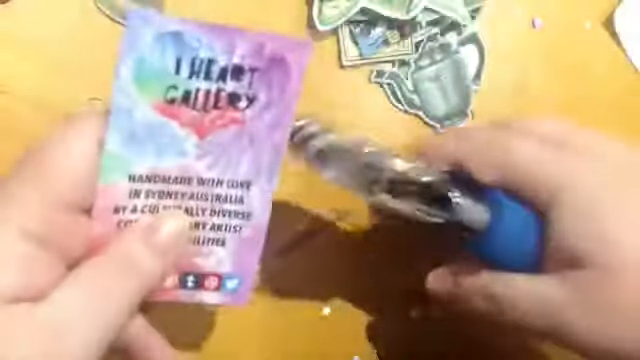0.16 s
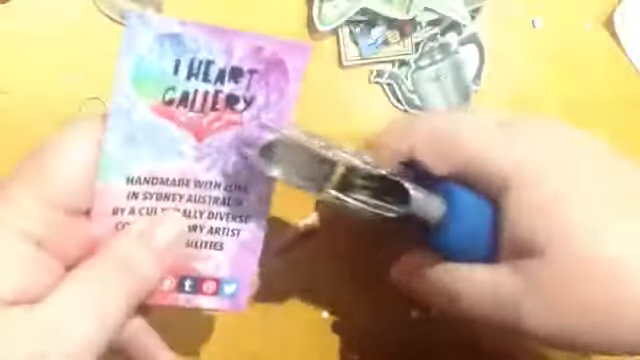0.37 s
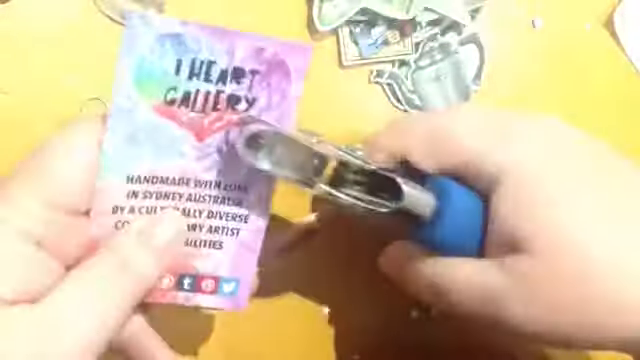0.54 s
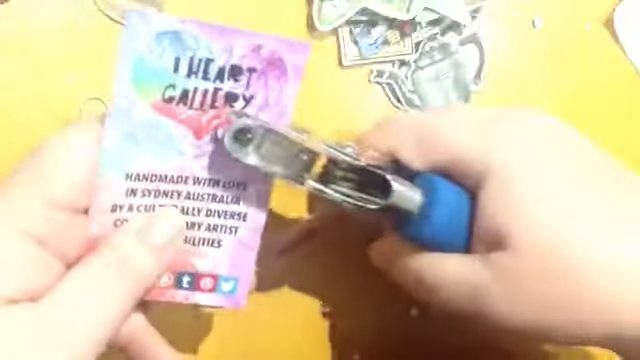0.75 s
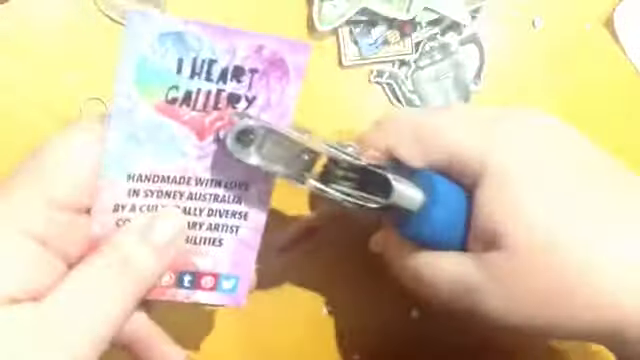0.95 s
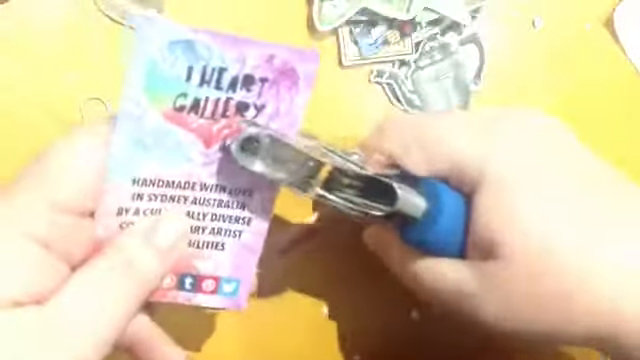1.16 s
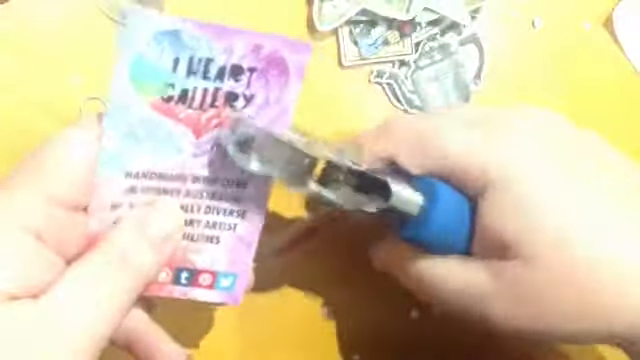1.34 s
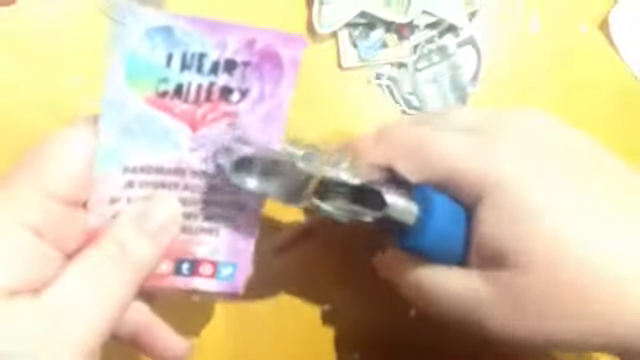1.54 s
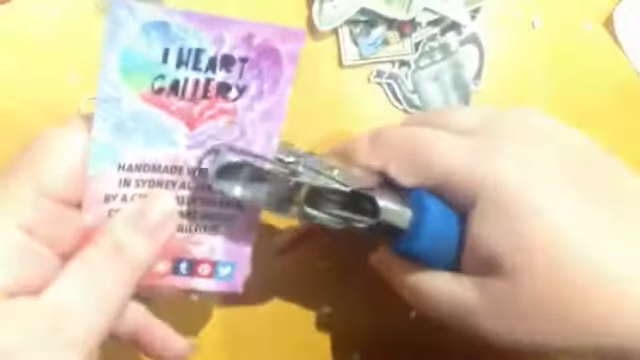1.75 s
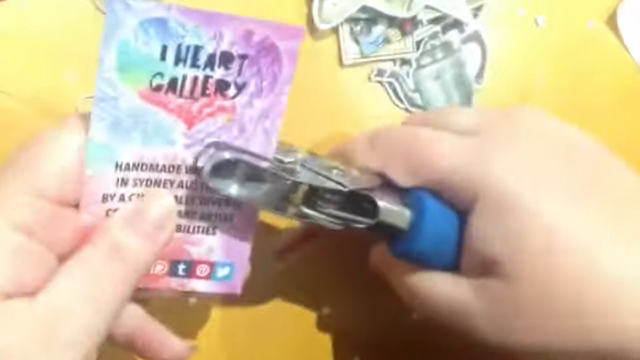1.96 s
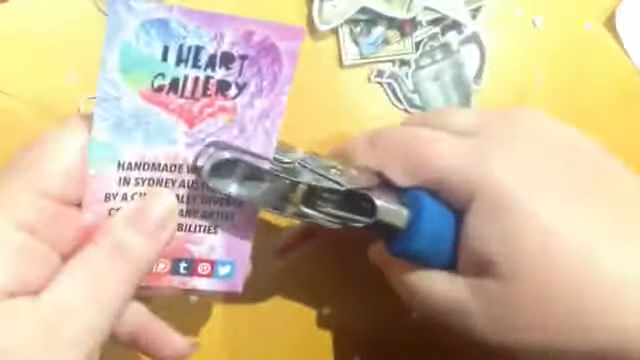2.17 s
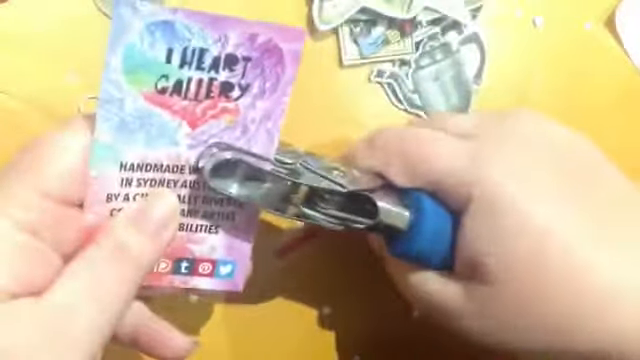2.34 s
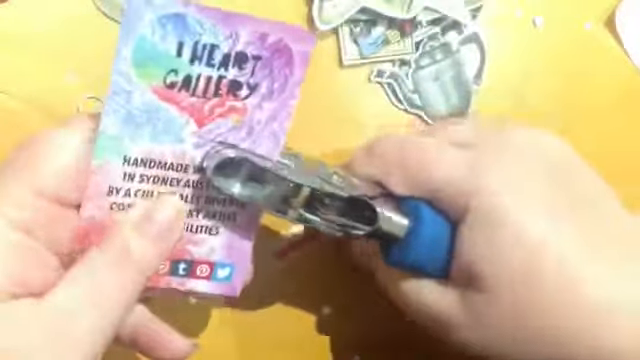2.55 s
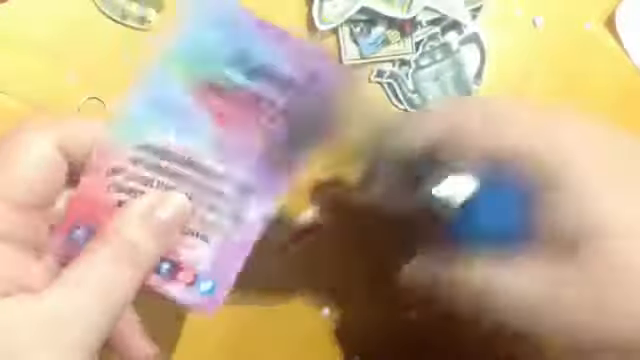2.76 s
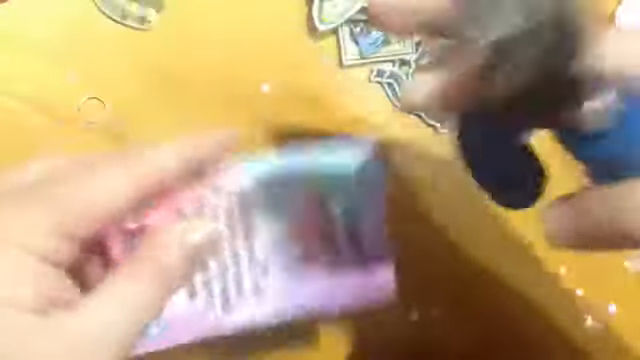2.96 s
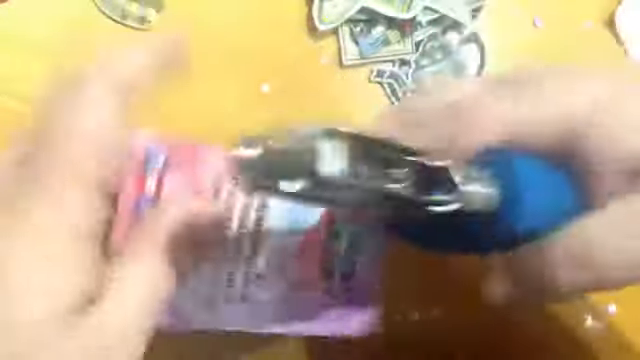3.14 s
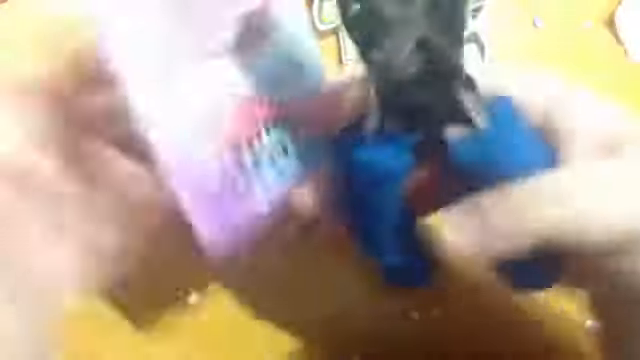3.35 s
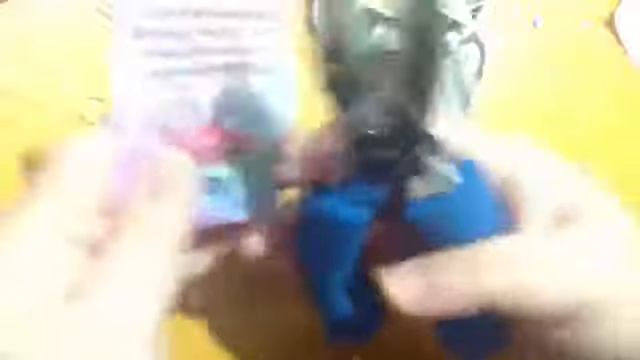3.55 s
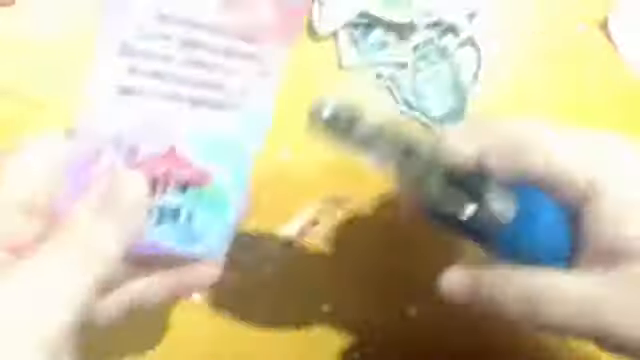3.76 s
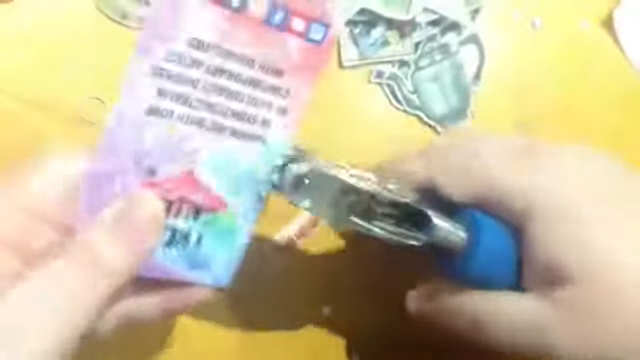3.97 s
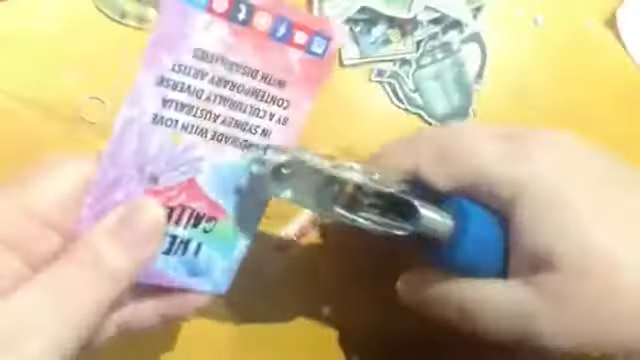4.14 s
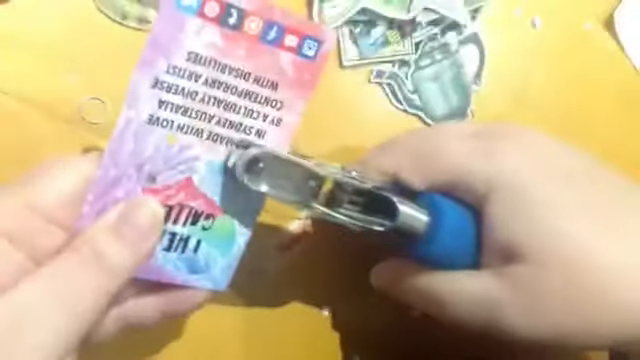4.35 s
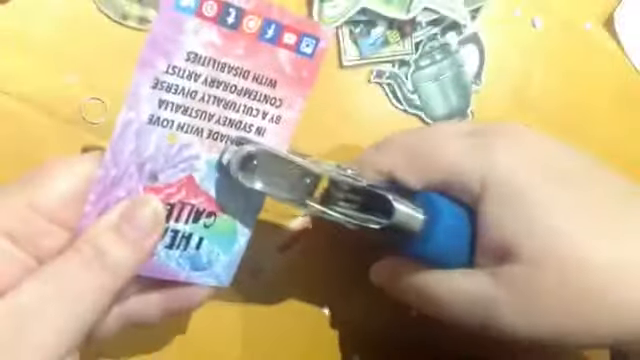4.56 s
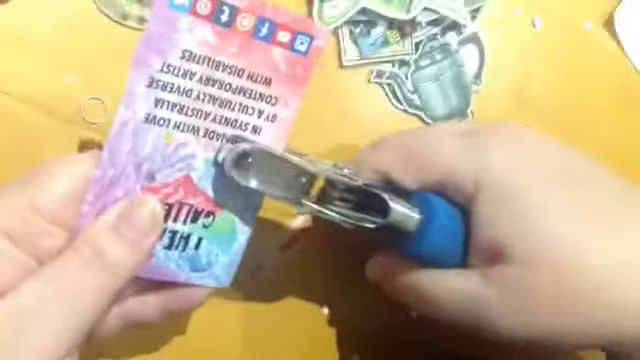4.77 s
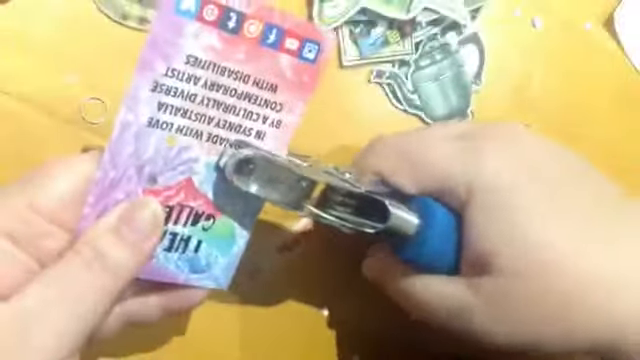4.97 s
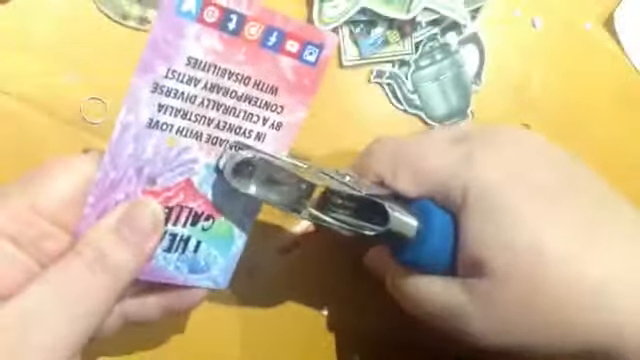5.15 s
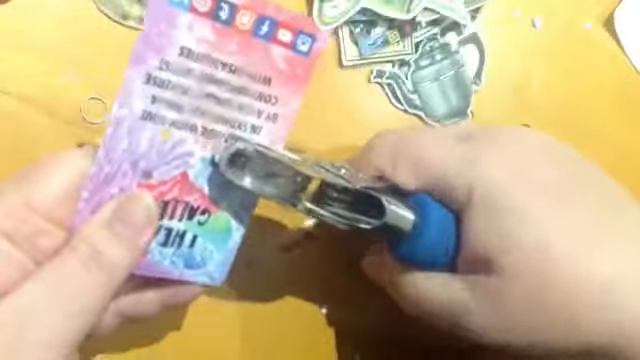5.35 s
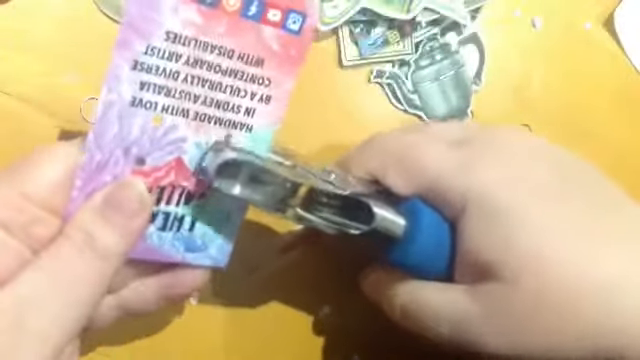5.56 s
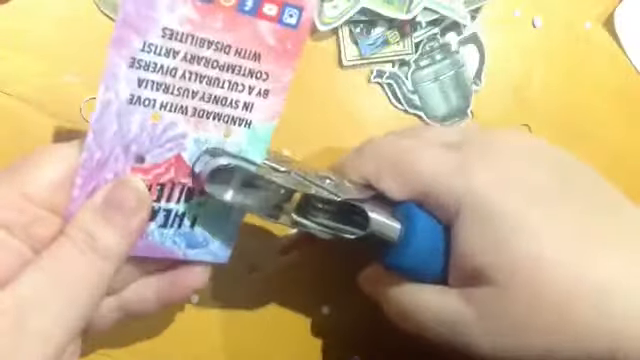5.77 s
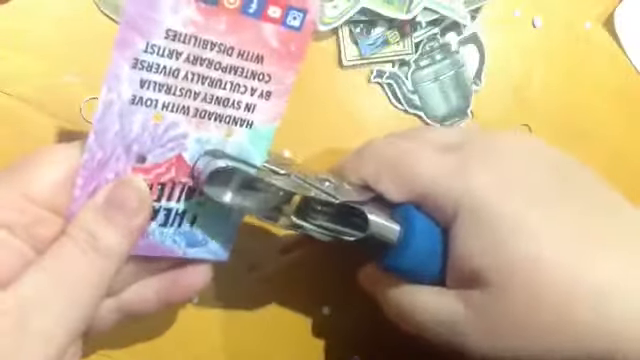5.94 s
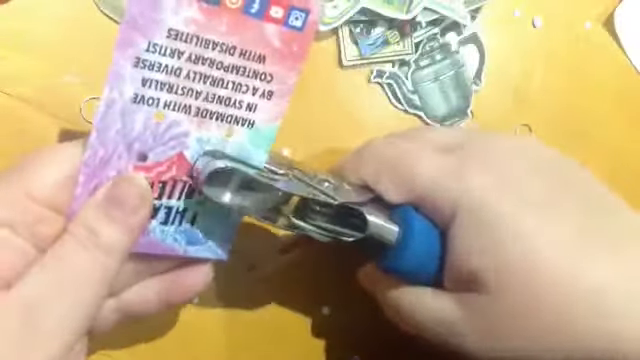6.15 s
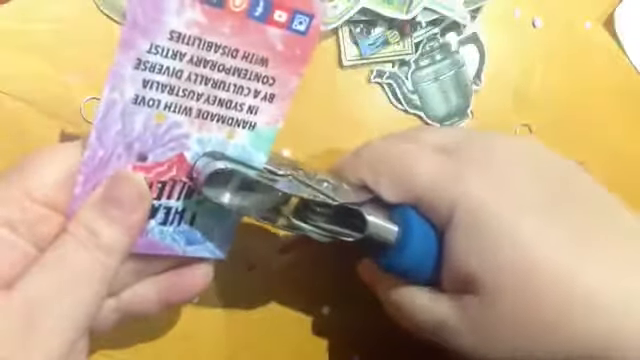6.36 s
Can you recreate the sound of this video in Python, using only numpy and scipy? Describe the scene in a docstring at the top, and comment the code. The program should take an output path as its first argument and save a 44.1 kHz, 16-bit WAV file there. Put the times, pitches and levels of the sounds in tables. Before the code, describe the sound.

A close microphone in a small, lightly reverberant room, with soft air noise and a low drone underneath. From 0 to 0.3 seconds card rustles and fingers tick faintly, then the grip creaks softly. At 1.1 a steel punch snaps through card: an abrupt, very loud crack with a short bright ring and quick room tail. A small clack follows at 1.3. After a light tick at 2.1, the second snap lands at 2.4 with a heavier low thump, and a very faint release at 2.6. From 2.6 to 3.9 card slides, hisses and crackles against fingers, with ticks and tiny jaw rattles near 3.55 and 3.85. A tick at 4.0, then faint gripping and a tiny spring ping around 4.5. The third snap at 5.1 is crisp, with more fibre tear; a clack at 5.3, then sparse ticks at 5.8 and 6.2. Background dips after each snap and creeps back.

```python
"""A steel hand punch

The punch bites through a card three times, close up in a small room.
Each bite tears fibres, snaps the jaws shut and rings the steel; then the pin clacks back out of the hole.
In between, card and fingers rub and tick, jaws rattle and a spring pings. A low drone fills the room.
Blows are brief noisy forces sent through resonances; rubbing is shaped noise.
An automatic gain control ducks at each snap and creeps back."""
import sys
import numpy as np
from scipy import signal
from scipy.fft import rfft, irfft, next_fast_len
from scipy.io import wavfile
from scipy.ndimage import uniform_filter1d, minimum_filter1d, map_coordinates

SR = 44100
rng = np.random.default_rng(int(sys.argv[2]) if len(sys.argv) > 2 else 0)


def generate_wav(sig):
    """Save sig (samples, or channels by samples) to the path in sys.argv[1] as 16-bit PCM at SR."""
    pcm = np.round(np.clip(np.atleast_2d(sig).T, -1, 1) * 32767).astype(np.int16)
    wavfile.write(sys.argv[1], SR, pcm)


N = 282636
TIME = np.arange(N) / SR  # seconds
HIT_TIME = TIME[:SR // 2]  # the half second that one blow may last
TOP_HZ = 15550  # upper edge of the finished sound

# The card gives way. Each row: start in seconds, level in dB, bass lift from the jolted hand in dB,
# contact time in seconds, tearing time before it in seconds, tearing level beside the snap in dB.
SNAPS = [(1.1094, 6, 5.5, 0.0015, 0.0014, -19), (2.4060, 5, 10.5, 0.0015, .0036, -23.5),
         (5.1342, 6, 1.5, 0.0011, 0.002, -11)]
# Colour of the shut jaws. Each row: frequency in Hz, relative level in dB per Hz.
JAW_COLOUR = [(40, -28.5), (150, -8.5), (300, -9.5), (450, -7), (600, -3), (850, 0), (1150, -0.5),
              (1500, -7.5), (1950, -8.5), (2600, -17), (3150, 3), (4000, -7), (4600, 0.5), (5600, -12.5),
              (8500, -10), (15000, -16.5)]
# How the jolt spreads over the bass. Each row: frequency in Hz, share of the bass lift (no unit).
THUMP_SHARE = [(40, 0.33), (130, 1), (280, 1), (450, 0.69), (650, 0.025)]
# Ringing of the steel frame and handles.
# Each row: frequency in Hz, strength beside the slam in dB, time to fade by 60 dB in seconds.
STEEL_MODES = [(570, -6, 0.05), (720, -9.5, 0.031), (798.3, -2.5, 0.08), (833, -4.5, 0.1),
               (1023, 2.5, 0.12), (1110, -3, 0.13), (1104, -3, 0.08), (1840, -6, 0.082), (3235, -2.5, .08),
               (3238, -6.5, .16), (3700, 1.5, 0.038), (4370, -2.5, 0.048), (4720, -5.5, 0.13),
               (6080, -4.5, 0.02), (8330, -1.5, 0.05), (10480, -3.5, 0.02), (13000, -0.5, 0.04)]
# Colour of card being torn or touched. Each row: frequency in Hz, relative level in dB per Hz.
CARD_COLOUR = [(300, -21.5), (2500, -10), (3900, 2.5), (5000, -2.5), (6200, -2), (9000, -2.5), (15000, -11)]

# The pin springs free of the card.
# Each row: start in seconds, level in dB, scrape beside the clack in dB, contact time in seconds.
RELEASES = [(1.2833, -19.5, -6.5, .0008), (2.6013, -33.5, 5, .001), (5.3256, -24, -2, 0.001586)]
# Colour of a clack or knock. Each row: frequency in Hz, relative level in dB per Hz.
CLACK_COLOUR = [(60, -31), (200, -16.5), (450, -8.5), (900, -14), (1350, -1.5), (1850, -3.5), (2500, -25),
                (3900, -11.5), (5500, -30.5), (15000, -44.5)]
# Ringing of the lever.
# Each row: frequency in Hz, strength beside the clack in dB, time to fade by 60 dB in seconds.
LEVER_MODES = [(1405, -5, 0.026), (1830, -6.5, 0.02), (3940, -5, 0.022)]

# Light touches of card and jaws. Each row: start in seconds, level in dB,
# hollow knock in dB before a lift shared by all, ring of the part touched in Hz.
TICKS = [(0.0632, -37.5, -27, 4530), (0.0913, -40.5, -21, 5060), (0.1129, -39, -37, 5500),
         (0.2228, -41, -43, 5800), (0.2993, -48.5, -5, 3870), (0.6471, -49.5, -7.5, 3790),
         (2.1301, -38.5, -25.5, 3830), (2.2603, -51.5, 3, 3284), (2.7277, -41, -6, 5600),
         (3.057, -48.5, -7.5, 5650), (3.1156, -39.5, -14, 4630), (3.2303, -45, -9, 7000),
         (3.364, -48.5, -5.5, 3950), (4.0302, -37, -23.5, 4820), (4.4667, -44, -19, 3975),
         (4.4922, -43.5, -21.5, 4610), (5.0518, -47, -17, 3720), (5.7623, -50, -16, 3483),
         (6.1584, -35, -27, 3826)]
# The open jaws rattle on their rivet. Each row: start in seconds, level of the first contact in dB.
RATTLES = [(3.552, -40.5), (3.831, -45.5)]
# Ringing of the loose jaws.
# Each row: frequency in Hz, strength beside the rattle in dB, time to fade by 60 dB in seconds.
RIVET_MODES = [(1230, 7.5, 0.01), (5200, 9.5, 0.0078), (6050, 6, 0.011)]
# The spring shifts in its seat. Each row: start in seconds, level in dB before it fades.
PINGS = [(.570, -64.5), (4.491, -53.5)]

# The card slides over fingers and jaws.
# Each row: start in seconds, length in seconds, hiss in dB, scrape in dB.
STROKES = [(0.09, .06, -56, -92), (0.292, 0.21, -70.5, -69), (2.649, 0.068, -57, -51.5),
           (2.724, 0.044, -44.5, -51.5), (2.802, 0.072, -56.5, -66.5), (2.859, 0.054, -53.5, -57),
           (3.052, 0.053, -59.5, -66.5), (3.105, 0.097, -55.5, -55), (3.362, 0.11, -57, -63),
           (3.472, 0.22, -58, -73), (3.684, .055, -62, -77), (4.03, 0.2, -65, -71.5),
           (4.874, .11, -77.5, -64)]
# The hands bring the card up and later turn it round.
# Each row: start in seconds, length in seconds, rustle in dB.
HANDLING = [(0, 0.35, -71.5), (2.601, 0.98, -71.5)]
# Colour of the sliding hiss. Each row: frequency in Hz, relative level in dB per Hz.
HISS_COLOUR = [(500, -6), (2500, -8), (4000, -5), (7000, -9), (11000, -7.5), (15000, -11.5)]
# Colour of small slips of card or skin. Each row: frequency in Hz, relative level in dB per Hz.
SLIP_COLOUR = [(200, 0.5), (900, 14.5), (5000, 4), (15000, -8.5)]
# Resonances that the card's slips excite. Each row: frequency in Hz, relative level in dB.
SCRAPE_MODES = [(1100, -2), (1450, 1), (1900, -2.5), (3900, -3.5)]
# The hand takes hold of the handles or squeezes them.
# Each row: start in seconds, length in seconds, level in dB.
GRIPS = [(0, 0.42, -70), (0.699, 0.61, -76), (4.45, .68, -70)]

# How long the room rings. Each row: frequency in Hz, time to fade by 60 dB in seconds.
ROOM_FADE = [(150, .2), (400, 0.48), (1000, 0.44), (1500, .28), (3500, .38), (8000, 0.29), (15000, 0.19)]
# Tone of the room's reverberation. Each row: frequency in Hz, level in dB.
ROOM_TONE = [(100, -15.5), (220, -10), (400, -3), (1000, 3.5), (1700, -3), (2500, 7), (3200, -1),
             (4500, -4), (6000, 2), (8000, 1.5), (15000, 3)]
# Echoes from desk and walls. Each row: delay in seconds, level in dB before they are dulled.
ECHOES = [(.0034, -15), (.0088, -24.5), (0.0123, -22), (0.058, -28.5), (0.068, -39)]
# Colour of the room background. Each row: frequency in Hz, relative level in dB per Hz.
AIR_COLOUR = [(15, -69.5), (25, -38.5), (49, -33), (101, -18), (135, -7), (163, 0.5), (257, -11.5),
              (344, -12), (438, -18.5), (604, -18.5), (856, -20.5), (1030, -20.5), (1580, -24.5),
              (4750, -27), (15000, -31)]


def snaps():
    """Fibres tear, the jaws slam shut, the hand takes the jolt and the slam sets the steel ringing."""
    out = np.zeros(N)
    for s, db, thump_db, width, tearing, tear_db in SNAPS:
        colour = [(hz, level + thump_db * along(THUMP_SHARE, hz)) for hz, level in JAW_COLOUR]
        slam = strike(contact(width), colour)
        tear = strike(contact(tearing * 0.54), CARD_COLOUR)
        add(out, s, amp(db) * ringing(slam, STEEL_MODES))
        add(out, s - tearing, amp(db + tear_db) * tear)
    return out


def releases(scrape_width=0.00092, scrape_lead=0.000562):
    """The pin scrapes out of its hole and the lever clacks open (settings in seconds)."""
    out = np.zeros(N)
    for s, db, scrape_db, width in RELEASES:
        clack = strike(contact(width), CLACK_COLOUR)
        scrape = strike(contact(scrape_width), CARD_COLOUR)
        add(out, s, amp(db) * clack)
        add(out, s - scrape_lead, amp(db + scrape_db) * scrape)
    return ringing(out, LEVER_MODES)


def touches(knock_db=7, edge_db=-8, ring_db=11, ring_t60=0.022, width=0.0013):
    """Light contacts: a dry tick of the card edge, a hollow knock and a brief ring of the part touched."""
    out = np.zeros(N)
    for s, db, hollow_db, hz in TICKS:
        tick = strike(contact(width), CARD_COLOUR)
        edge = amp(edge_db) * ringing(tick, [(hz, ring_db, ring_t60)])
        knock = amp(hollow_db + knock_db) * strike(contact(width), CLACK_COLOUR)
        add(out, s, amp(db) * (edge + knock))
    return out


def rattles(flight=.004, loss_db=5, knock_db=-7, width=.0035, count=3):
    """The loose jaws bounce a few times, a flight (seconds) apart, each contact set weaker than the last."""
    out = np.zeros(N)
    for s, db in RATTLES:
        for k in range(count):
            knock = amp(knock_db) * strike(contact(width), CLACK_COLOUR)
            blow = strike(contact(width), CARD_COLOUR) + knock
            add(out, s + k * flight, amp(db - k * loss_db) * blow)
    return ringing(out, RIVET_MODES)


def spring(hz=2800, q=10, t60=0.14, rise=0.00072):
    """The coils scrape on each other and ring faintly: resonant noise that rises fast and fades."""
    out = np.zeros(N)
    for s, db in PINGS:
        scrape = rng.standard_normal(len(HIT_TIME))
        coil = unit(resonate(resonate(scrape, hz, q), hz, q))
        fade = amp(db - 60 * HIT_TIME / t60)
        add(out, s, fade * coil * (1 - np.exp(-HIT_TIME / rise)))
    return out


def rubbing(grain_db=2.0, slip_db=4, catch_db=2.5, scrape_q=7, rustle_scrape_db=-2, crackle_db=-4):
    """Sliding card hisses and crackles, its tiny slips excite resonances; handling adds a soft rustle."""
    grainy = unit(amp(grain_db * wobble(1200)) * noise(HISS_COLOUR))
    hiss = unit(grainy + amp(crackle_db) * crackle())
    slips = unit(amp(slip_db * wobble(830)) * noise(SLIP_COLOUR))
    scrape = unit(sum(amp(db) * unit(resonate(slips, hz, scrape_q)) for hz, db in SCRAPE_MODES))
    strokes = np.zeros(N)
    for s, length, hiss_db, scrape_db in STROKES:
        strokes += pressure(s, length) * (amp(hiss_db) * hiss + amp(scrape_db) * scrape)
    moving = sum(amp(db) * pressure(s, length) for s, length, db in HANDLING)
    rustle = moving * (hiss + amp(rustle_scrape_db) * scrape)
    return (strokes + rustle) * amp(catch_db * wobble(90))  # the level flutters


def crackle(rate=260, size_db=5):
    """Tiny catches of the card's fibres at random moments, rate a second on average; rms 1."""
    size = amp(size_db * np.minimum(rng.exponential(size=N), 2))
    catches = (rng.random(N) < rate / SR) * size * rng.choice([-1, 1], N)
    return unit(signal.fftconvolve(catches, strike(contact(width=.0003), CARD_COLOUR))[:N])


def grip(slip_db=4, hz=720, q=3.9):
    """Skin creeps on the handles while the grip tightens: uneven noise through one resonance."""
    creep = unit(resonate(amp(slip_db * wobble(600)) * noise(SLIP_COLOUR), hz, q))
    return creep * sum(amp(db) * pressure(s, length, skew=0.69, softness=0.44) for s, length, db in GRIPS)


def pressure(s, length, skew=0.49, softness=0.74):
    """A stroke's strength swells fast and fades."""
    u = np.clip((TIME - s) / length, 0, 1)
    return np.abs(np.sin(np.pi * u ** skew)) ** softness


def contact(width, scatter=0.58, patch_hz=220):
    """A brief rough force of energy 1: every frequency arrives, each at a slightly different moment."""
    hz = np.fft.rfftfreq(2048, 1 / SR)
    knots = rng.standard_normal(len(hz))
    # Neighbouring frequencies share similar delays, around the contact time in seconds.
    delay = width * np.exp(scatter * np.clip(map_coordinates(knots, [hz / patch_hz]), -2, 2))
    phase = -2 * np.pi * hz[1] * np.cumsum(delay)
    force = irfft(np.exp(1j * phase))[:len(hz)]
    force *= np.exp(-(HIT_TIME[:len(hz)] / (5 * width)) ** 4)  # fades out the late end
    return force / np.linalg.norm(force)


def strike(force, spectrum):
    """A force through a damped body that responds only after it; about as strong as 1 ms at full level."""
    size = len(HIT_TIME)
    # Folding the log spectrum's transform puts the body's energy as early as possible.
    cepstrum = irfft(np.log(amp(along(spectrum, np.fft.rfftfreq(size, 1 / SR)))))
    fold = 1 + np.sign(np.fft.fftfreq(size))
    body = irfft(np.exp(rfft(cepstrum * fold)))
    gain = np.sqrt(SR / 1000) / np.linalg.norm(body)
    return gain * signal.fftconvolve(force, body)[:size]


def ringing(blow, modes):
    """A blow plus the decaying resonances that it excites."""
    out = blow.copy()
    for hz, db, t60 in modes:
        q = np.pi * hz * t60 / np.log(1000)  # sharpness that gives this fading time
        out += amp(db) * resonate(blow, hz, q)
    return out


def resonate(x, hz, q):
    """One resonance with gain 1 at its peak."""
    return signal.lfilter(*signal.iirpeak(hz, q, SR), x)


def noise(spectrum):
    """Coloured noise of rms 1."""
    m = next_fast_len(N)
    white = rfft(rng.standard_normal(m))
    return unit(irfft(white * amp(along(spectrum, np.fft.rfftfreq(m, 1 / SR))), m)[:N])


def wobble(rate):
    """A smooth random curve through rate random points a second."""
    return map_coordinates(rng.standard_normal(int(N * rate / SR) + 4), [TIME * rate])


def amp(db):
    """Decibels to gain."""
    return 10 ** (np.asarray(db) / 20)


def unit(x):
    """Scale to rms 1."""
    return x / np.sqrt(np.mean(x ** 2) + 1e-20)


def along(points, hz):
    """Read off a curve of (Hz, value) points joined on a log frequency axis."""
    f, v = np.transpose(points)
    return np.interp(np.log(hz + 1), np.log(f), v)


def add(track, s, sound):
    """Mix a sound into a track at time s in seconds."""
    part = track[max(round(s * SR), 0):][:len(sound)]
    part += sound[:len(part)]


def room(x, early_db=-16, early_t60=0.099, late_db=-13.0, build=.0012, echo_low_hz=600, echo_hz=5000):
    """Dull desk and wall echoes, a quick dense scatter and a longer tail, made of fading noise."""
    hz, t, z = signal.stft(rng.standard_normal(SR * 3 // 4), SR, nperseg=256)
    late_t60 = along(ROOM_FADE, hz)[:, None]
    early = amp(early_db - 60 * t / early_t60) / np.sqrt(early_t60)
    late = amp(late_db - 60 * t / late_t60) / np.sqrt(late_t60)
    shape = np.hypot(early, late) * amp(along(ROOM_TONE, hz))[:, None]
    tail = signal.istft(z * shape, SR, nperseg=256)[1]
    tail *= np.sqrt(2 * np.log(1000) / SR)  # evens out energy for any fading time
    tail *= 1 - np.exp(-(TIME[:len(tail)] / build) ** 2)  # the scatter builds up
    dull = signal.butter(1, [echo_low_hz, echo_hz], "bandpass", fs=SR)
    for delay, db in ECHOES:
        add(tail, delay, amp(db) * signal.lfilter(*dull, contact(width=0.0012)))
    return x + signal.fftconvolve(x, tail)[:N]


def background(air_db=-62, drone_db=-69.5, drone_hz=167, waver_rate=14):
    """Room air as coloured noise, with a low drone whose strength and phase waver at random."""
    turn = 2 * np.pi * drone_hz * TIME
    drone = unit(wobble(waver_rate) * np.sin(turn) + wobble(waver_rate) * np.cos(turn))
    return amp(air_db) * noise(AIR_COLOUR) + amp(drone_db) * drone


def scene():
    """Punch, card and hands sound in the room, over its steady background."""
    near = snaps() + releases() + touches() + rattles() + spring() + rubbing() + grip()
    return (room(near) + background())[None]


def gain_control(x, limit_db=-12, hold=0.099, recovery=0.86):
    """Gain drops just ahead of a loud peak, holds, and creeps back (hold and recovery in seconds)."""
    level_db = 10 * np.log10(np.abs(uniform_filter1d(x ** 2, size=132)) + 1e-12)
    excess = np.maximum(level_db - limit_db, 1e-6)
    span = int(hold * SR) | 1
    held = -minimum_filter1d(-excess, span, origin=span // 2)  # largest recent excess
    # A running maximum of the growing curve gives a cut that decays between peaks.
    cut_db = np.maximum.accumulate(held * np.exp(TIME / recovery), axis=-1) * np.exp(-TIME / recovery)
    early_gain_db = minimum_filter1d(-cut_db, size=260)  # starts about 3 ms ahead
    return x * amp(uniform_filter1d(early_gain_db, size=130))


def record(dry):
    """Automatic gain control, then softly rounded peaks and a steep cut of the highest treble."""
    x = gain_control(dry)
    x = x / (1 + (x / .7) ** 6) ** (1 / 6)  # peaks bend towards 0.7
    m = next_fast_len(N + SR // 2)
    band = 1 / np.sqrt(1 + (np.fft.rfftfreq(m, 1 / SR) / TOP_HZ) ** 160)
    return irfft(rfft(x, m) * band, m)[..., :N]


dry = scene()
out = record(dry)
generate_wav(out)
```